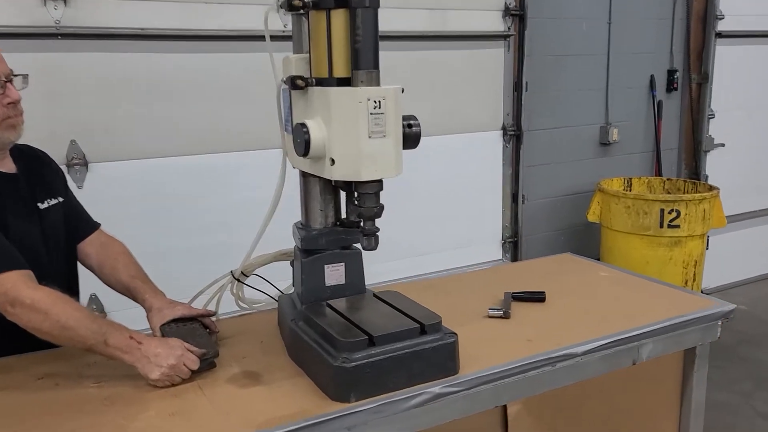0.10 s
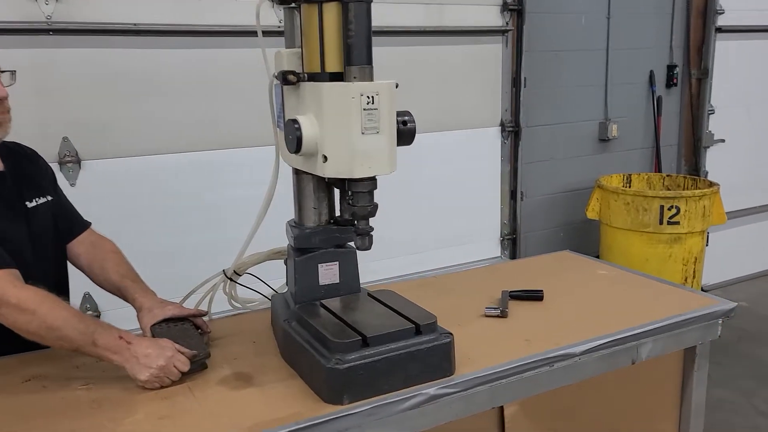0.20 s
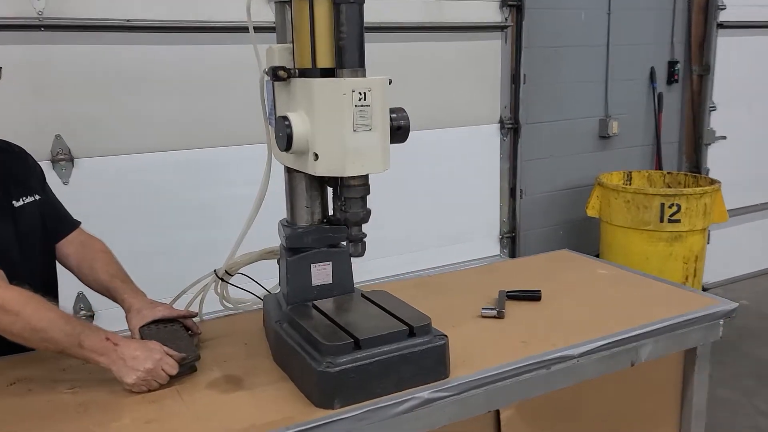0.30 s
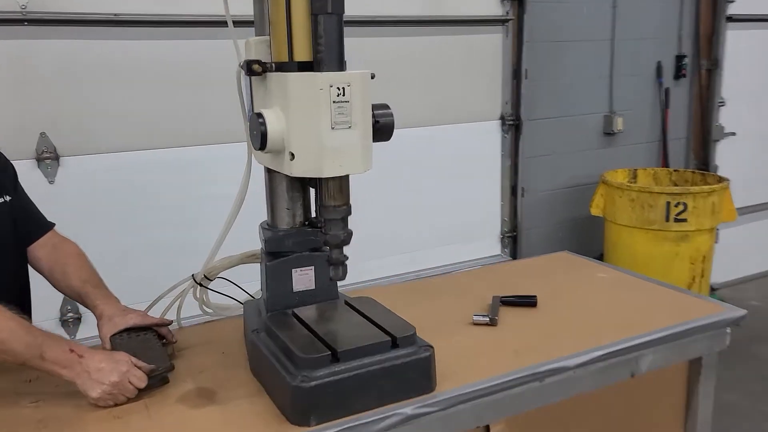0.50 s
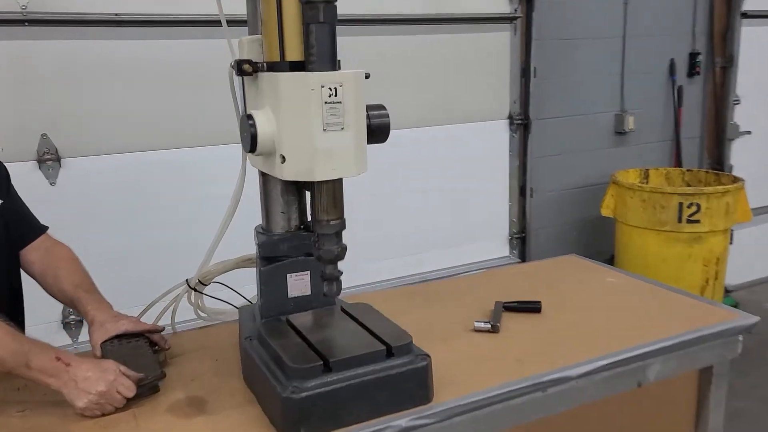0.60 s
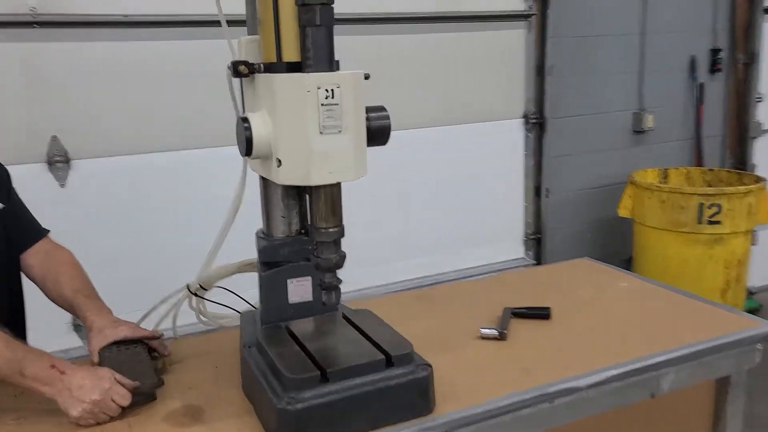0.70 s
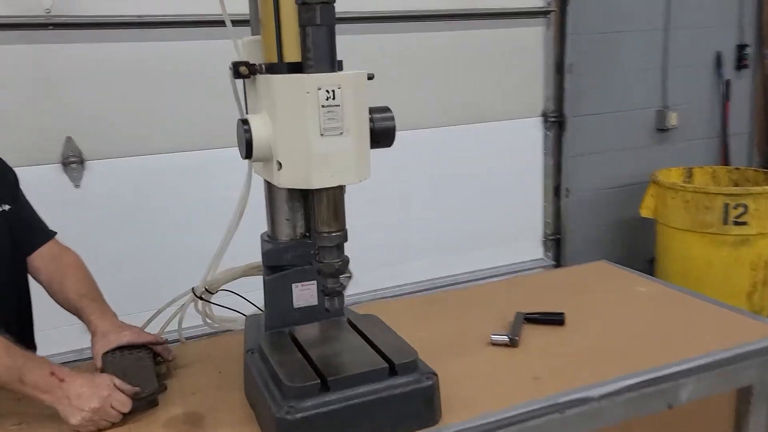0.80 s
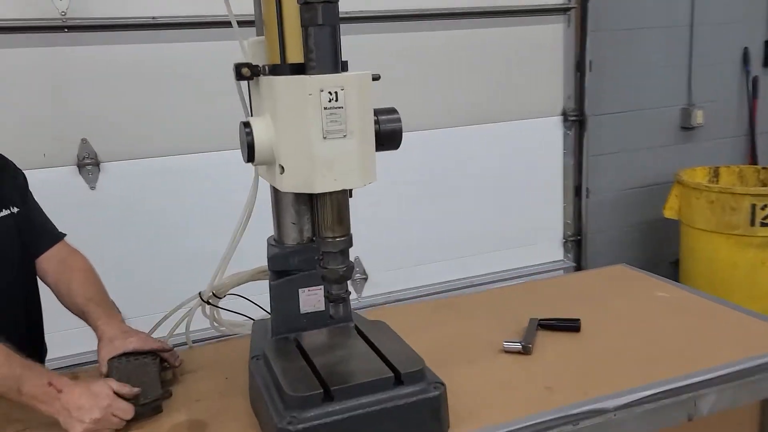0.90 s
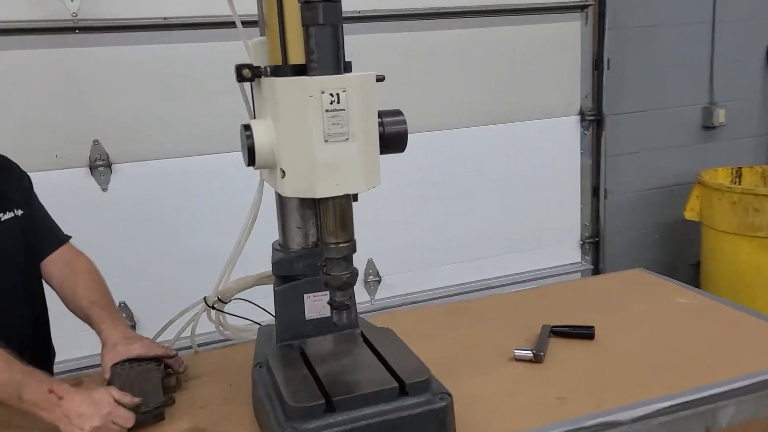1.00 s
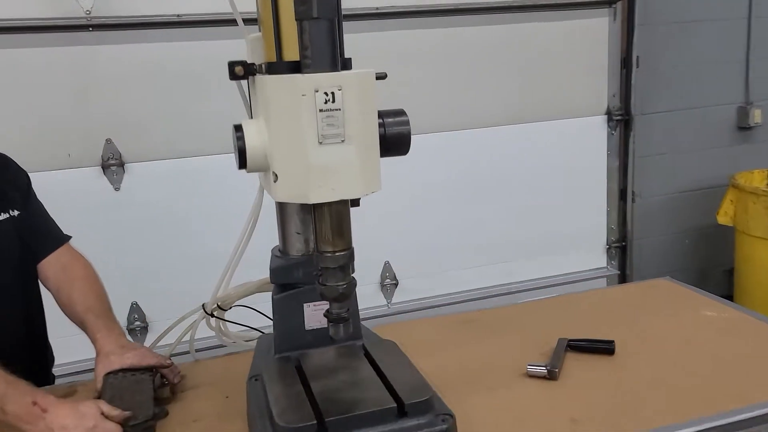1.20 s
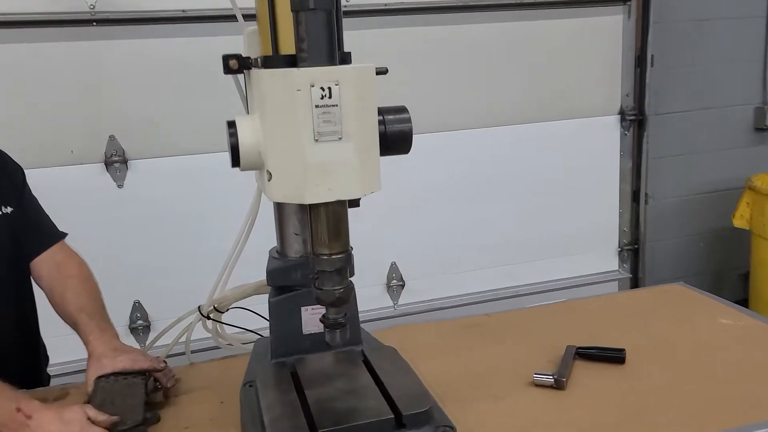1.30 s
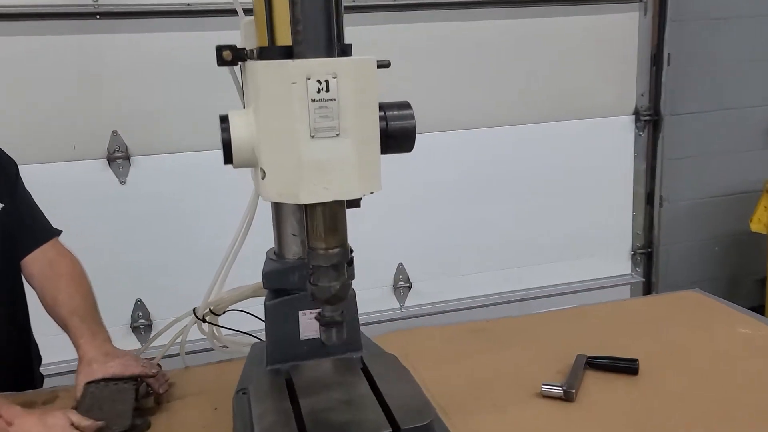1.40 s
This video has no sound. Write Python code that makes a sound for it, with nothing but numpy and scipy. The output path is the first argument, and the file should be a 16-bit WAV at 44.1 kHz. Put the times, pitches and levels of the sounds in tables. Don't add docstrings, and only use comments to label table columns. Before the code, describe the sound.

Compressed air from a bench press, heard close in stereo in a large, reverberant workshop. Quiet distant machine rumble first; hiss swells quickly from about 0.2 seconds to a bright, fluttering rush by 0.3. The ram lands with a dull double thud and small bounces at 0.73-0.77. Air cuts off around 0.9-1.0 with soft valve bumps; echoes fade. A faint lever knock at 1.3, then leaking hiss begins.

```python
import sys
import numpy as np
from scipy import signal
from scipy.io import wavfile
from scipy.ndimage import uniform_filter1d

SR = 44100
rng = np.random.default_rng(int(sys.argv[2]) if len(sys.argv) > 2 else 0)


def ratio_of_db(decibels):
    return 10 ** (np.asarray(decibels, float) / 20)


def materialize(psi):
    bounded = np.clip(np.atleast_2d(psi).T, -1, 1)
    quanta = np.round(bounded * 32767).astype(np.int16)
    wavfile.write(sys.argv[1], SR, quanta)


N = 61740

# (frequency [Hz], density [dB per Hz])
WASH = [(20, -9.5), (60, -12.5), (150, -18), (500, -32.5), (2000, -22), (4000, -28.5), (10500, -54.5),
        (16000, -76)]
# (frequency [Hz], width [Hz], level [dB])
MOTORS = [(91.5, 5, -44.5), (127.5, 6.7, -52), (189, 12, -56)]
# (frequency [Hz], t60 [s])
HALL_DECAY = [(100, 1.1), (300, 1.0), (1000, 1.98), (2500, 1.62), (4500, 1.89), (7500, 1.23), (12000, 0.58),
              (16000, .5)]
# (frequency [Hz], level [dB])
HALL_TONE = [(100, -3), (300, -8.5), (900, -7), (2000, -3), (2900, -13.5), (4200, -5.5), (7000, -6),
             (12000, -7.5)]
# (frequency [Hz], level [dB], t60 [s])
LEVER_MODES = [(130, -35, .06), (250, -34, .03), (390, -28, .026), (520, -38, .02), (920, -38, .02),
               (1500, -34, .012)]
# (time [s], level [dB], contact [s])
PUSHES = [
    (.7299, -1, .0012),
    (.744, .5, .0012),
    (.7594, -8, .0012),
    (.774, -9.5, .0012),
    (.984, -13, .006),
    (1.017, -11, .006),
]
# (frequency [Hz], level [dB], t60 [s])
FRAME_MODES = [(65, -19, .08), (112, -11, .17), (190, -19, .15), (308, -.5, .048), (357, -4, .075),
               (461, -12, .06)]
# (time [s], level [dB re full flow])
VALVE_FLOW = [(.1, -54.5), (.155, -45), (.19, -21), (.203, -12.5), (.232, -12.5), (.242, -7), (.265, -2.5),
              (.31, -0.34), (.375, -0.5), (.415, 0.03), (.72, -0.34), (.878, 1), (.935, -10.5), (1.0, -40),
              (1.3, -45), (1.39, -31.5), (1.4, -24)]
# (frequency [Hz], loss [dB per dB of lost flow])
FLOW_LOSS = [(1000, 2.3), (2100, .65), (3600, .65), (4600, 2.6), (6400, .75), (8000, 1.55), (11500, 2.3),
             (15500, 1.35)]
# (frequency [Hz], width [Hz], left [dB], right [dB], phase of right [rad])
PORT_MODES = [(396, 79, -10.5, -6, -1.35), (819, 88, -7.5, 0, -0.28), (1028, 253, -4, -0.5, -2),
              (1795, 1345, -6, -3.5, -3), (2360, 700, -20.5, 0, 4.5), (2872, 600, 5.5, 0.5, 2.5),
              (3573, 270, -9, -4.5, 1.84), (4890, 190, -13.5, -3.5, 0.2), (6370, 490, -15, -29, 1),
              (7300, 1200, -11.5, -20, 2), (9090, 980, -7, -12.5, -1.55), (12330, 900, -4, -7.5, .4),
              (13720, 790, -2, -12.5, 3.5), (15350, 650, -3.5, -8.5, -1)]
# (frequency [Hz], level [dB])
SPRAY_TONE = [(200, -57), (550, -39), (1500, -11), (4000, -8.5), (8000, -14.5), (11000, -12.5),
              (16000, -14.5)]
# (frequency [Hz], level [dB])
LANDED_TONE = [(600, -2.1), (1000, -1.2), (2000, -1.3), (3000, -2.8), (5000, -2.1), (7500, 0.22),
               (12300, -0.61), (15000, -0.22)]
# (frequency [Hz], level
# [dB])
DRIFT_TONE = [(400, 2.5), (900, 0.5), (1800, .5), (3000, 1), (5000, -0.5), (9000, -.5), (12300, -0.5),
              (15000, -1.5)]


def evened(x):
    return x / np.sqrt(np.mean(np.abs(x) ** 2) + 1e-20)


def read(points, hz):
    f, value = np.transpose(points)
    return np.interp(np.log(hz + 1), np.log(f + 1), value)


def chance(*shape):
    return rng.standard_normal(shape) + 1j * rng.standard_normal(shape)


def alike_bass(z, hz):
    same = 0.96 / (1 + (hz / 630) ** 2)[:, None]
    right = same * z[0] + np.sqrt(1 - same ** 2) * z[1]
    return np.array([z[0], right])


def ring(modes, t):
    return sum(ratio_of_db(db - 60 * t / t60) * np.sin(2 * np.pi * hz * t) for hz, db, t60 in modes)


def resonance(hz, centre, width):
    return 1 / (1 + (2 * (hz - centre) / width) ** 2)


def workshop():
    frames, hz = N // 1024 + 5, np.fft.rfftfreq(4096, 1 / SR)
    z = alike_bass(chance(2, len(hz), frames), hz)

    def sound(gain):
        return evened(signal.istft(z * gain[:, None], nperseg=4096, noverlap=3072)[1][:, :N])

    wash = ratio_of_db(-41) * sound(ratio_of_db(read(WASH, hz)))
    drones = sum(ratio_of_db(db) * sound(resonance(hz, f, width)) for f, width, db in MOTORS)
    side_db = np.array([[-0.7], [0.7]])
    return (wash + drones) * ratio_of_db(side_db)


def hall(x):
    taps = np.zeros((2, N))
    at = np.arange(400, N - 20, 20)
    shape = 2, len(at)
    np.put_along_axis(taps, at + rng.integers(0, 20, shape), rng.choice([-1., 1.], shape), 1)
    hz, t, z = signal.stft(taps, SR, nperseg=512)
    decay = ratio_of_db(-60 * t / read(HALL_DECAY, hz)[:, None])
    decay /= np.sqrt(np.mean(decay ** 2, 1, keepdims=True))
    decay *= ratio_of_db(read(HALL_TONE, hz))[:, None]
    tail = signal.istft(alike_bass(z, hz) * decay, SR, nperseg=512)[1] / np.linalg.norm(taps[0])
    return signal.fftconvolve(x, tail, axes=1)[:, :N]


def lever_knock():
    knock_s = 1.3156
    return -ring(LEVER_MODES, np.maximum(np.arange(N) / SR - knock_s, 0))


def frame_thuds():
    t, push = np.arange(N) / SR, np.zeros(N)
    thud_db, rise_s = 0.5, 0.006
    for s, db, contact in PUSHES:
        pulse = np.sin(np.pi * np.clip((t - s) / contact, 0, 1))
        push -= ratio_of_db(db + thud_db) * pulse / (contact * SR)
    response = ring(FRAME_MODES, t) * (1 - np.exp(-t / rise_s))
    return signal.fftconvolve(push, response)[:N]


def port_jet(hz, frames):
    lag_s, flutter_db = 0.0003, 1.39
    f, width, left_db, right_db, phase = np.transpose(PORT_MODES)[:, :, None]
    flutter = rng.standard_normal((len(PORT_MODES), frames))
    flutter = evened(uniform_filter1d(uniform_filter1d(flutter, size=6), size=6))
    peak = resonance(hz, f, width) ** 1.143
    left = ratio_of_db(left_db) * peak
    right = ratio_of_db(right_db) * peak * np.exp(1j * (phase - 2 * np.pi * lag_s * (hz - f)))
    gains = np.array([side.T @ ratio_of_db(flutter_db * flutter) for side in (left, right)])
    return chance(len(hz), frames) * gains


def spray(hz, frames):
    tilt_db = 1.5 * np.array([[0.5], [-0.5]]) * np.minimum(hz / 8000, 1.5)
    noise = alike_bass(chance(2, len(hz), frames), hz)
    return noise * ratio_of_db(read(SPRAY_TONE, hz) + tilt_db)[:, :, None]


def turbulence(hz, frames):
    patches = uniform_filter1d(rng.standard_normal((len(hz), frames)), size=14, axis=1)
    patches = evened(uniform_filter1d(patches, size=8, axis=0))
    gusts = evened(uniform_filter1d(rng.standard_normal(frames), size=4))
    return ratio_of_db(1.32 * patches + 0.44 * gusts)


def air_hiss():
    frames, hz = N // 128 + 5, np.fft.rfftfreq(512, 1 / SR)
    t = np.arange(frames) * 128 / SR
    landed_s, reopen_s, drift_s = 0.718, 1.1, 0.27
    wobble = turbulence(hz, frames)
    jet, loose = port_jet(hz, frames) * wobble, spray(hz, frames) * wobble
    full_flow = signal.istft(jet + loose, nperseg=512, noverlap=384)[1]
    level = ratio_of_db(-14.5) / np.sqrt(np.mean(full_flow ** 2))

    closing = (t > landed_s) & (t < reopen_s)
    loss = np.where(closing, 1.2, read(FLOW_LOSS, hz)[:, None])
    flow_db = loss * np.interp(t, *np.transpose(VALVE_FLOW))
    landed_db = read(LANDED_TONE, hz)[:, None] * np.clip((t - landed_s) / 0.05, 0, 1)
    drift = np.clip(2 * (t - landed_s) / drift_s + 1, -1, 1)
    drift_db = read(DRIFT_TONE, hz)[:, None] * drift
    z = jet * ratio_of_db(flow_db) + loose * ratio_of_db(1.3 * flow_db)
    z = z * ratio_of_db(landed_db + drift_db)
    return level * signal.istft(z, nperseg=512, noverlap=384)[1][:, :N]


def scene():
    side_db = np.array([[-1.5], [1.5]])
    knocks = (lever_knock() + frame_thuds()) * ratio_of_db(side_db)
    press = air_hiss() + knocks
    return workshop() + hall(press) + press


def band_limit(x):
    return signal.sosfilt(signal.butter(12, 16940, fs=SR, output="sos"), x)


def record(dry):
    bass_cut_hz, edge_hz = 22, 15800
    cut = signal.sosfilt(signal.butter(2, bass_cut_hz, "high", fs=SR, output="sos"), dry)
    edge = signal.firwin(511, edge_hz, window=("kaiser", 9), fs=SR)
    mix = signal.oaconvolve(cut, edge[None], "same")
    return band_limit(mix)


dry = scene()
out = record(dry)
materialize(out)
```